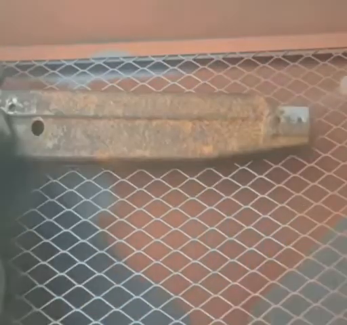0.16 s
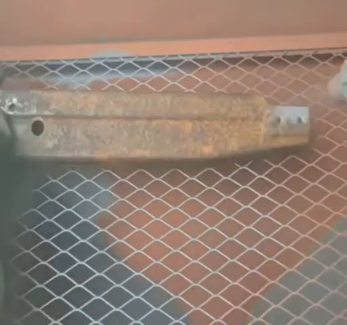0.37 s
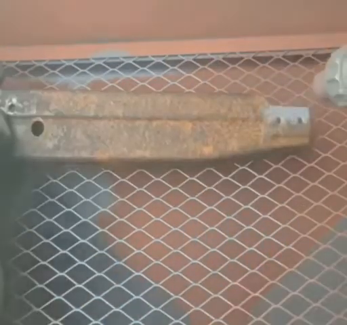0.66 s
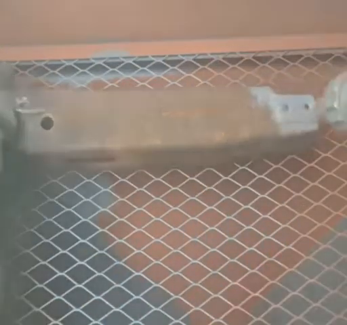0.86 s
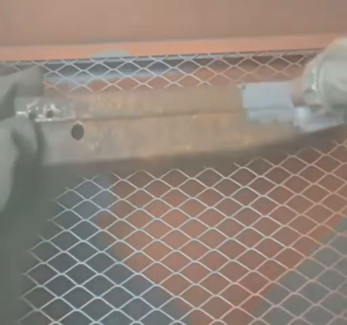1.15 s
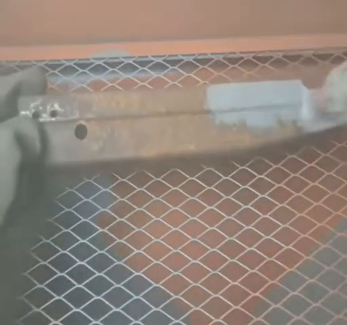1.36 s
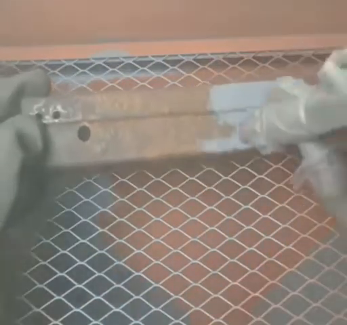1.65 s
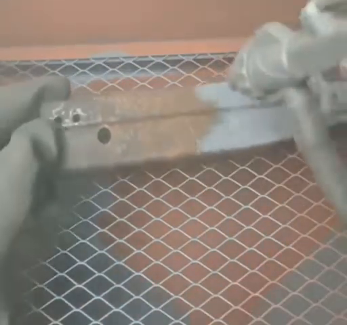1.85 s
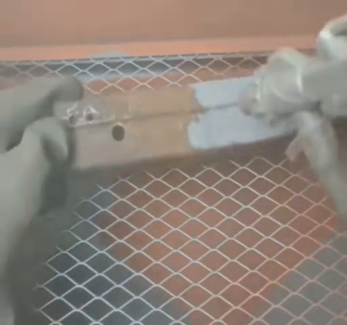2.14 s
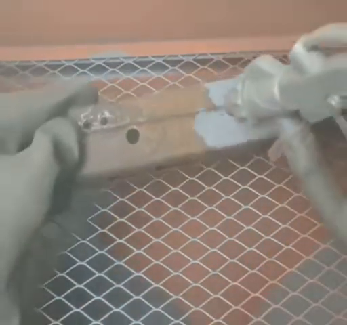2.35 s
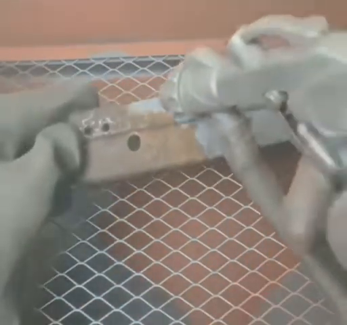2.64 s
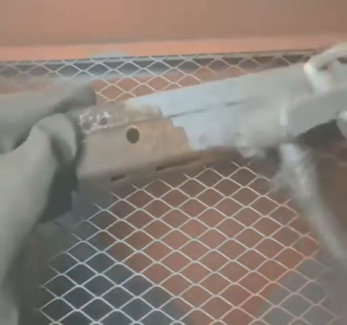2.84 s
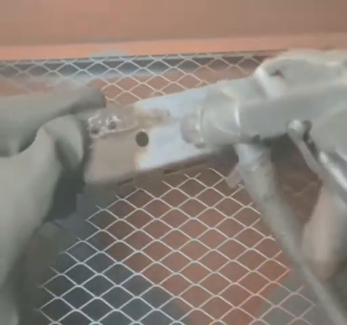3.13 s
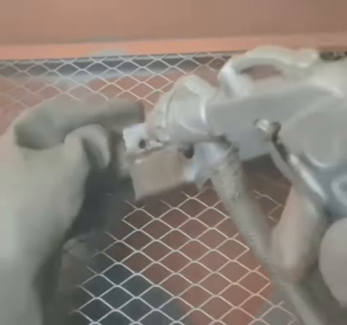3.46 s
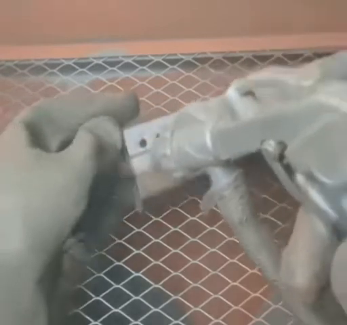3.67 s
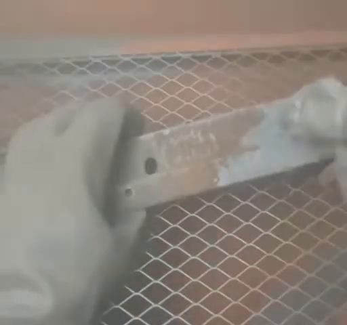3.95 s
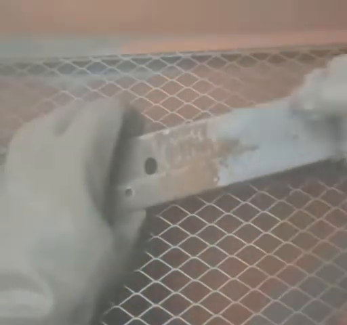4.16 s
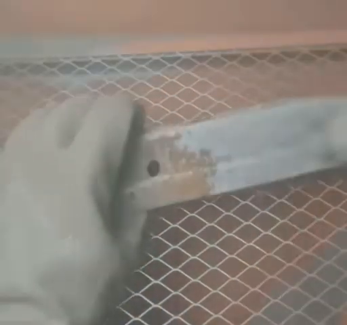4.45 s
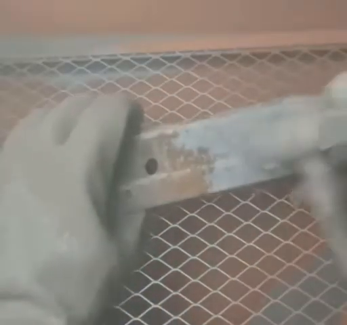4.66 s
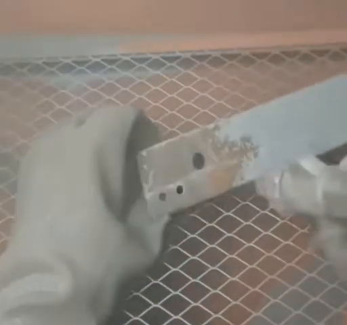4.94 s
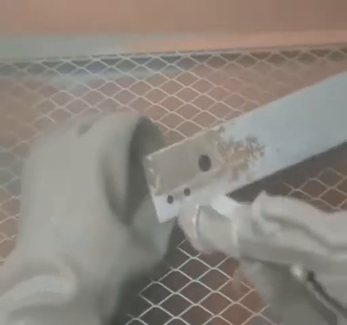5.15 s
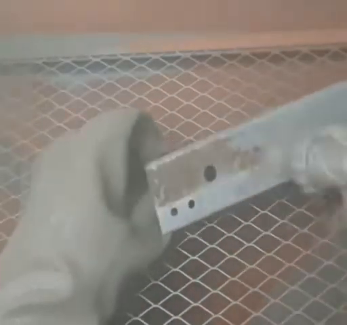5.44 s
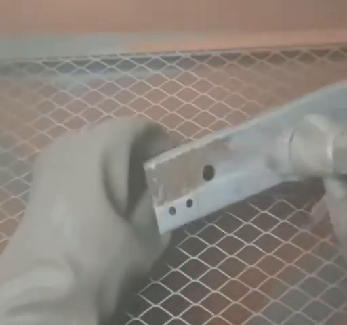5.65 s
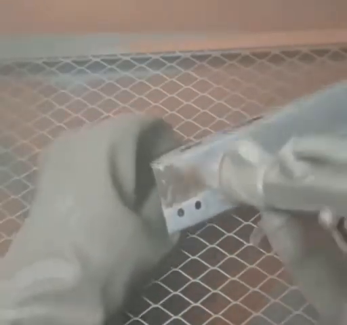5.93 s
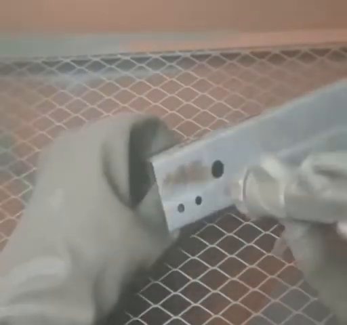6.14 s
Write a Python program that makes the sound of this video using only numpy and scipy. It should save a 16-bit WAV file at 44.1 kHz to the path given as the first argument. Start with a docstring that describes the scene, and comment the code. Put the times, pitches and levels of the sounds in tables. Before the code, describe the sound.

A continuous, dense rush of compressed air and abrasive grit on steel, heard close, the same on both sides, with short metallic cabinet reflections. After half a second it suddenly weakens, then builds back. Passes over the bar change the splash and sizzle, with a breathy note underneath. Halfway through, the jet locks into a clear thin whistle, and a soft triple knock follows before the blasting continues to the end.

```python
"""Blast cabinet, close up

A blast gun strips rust from a steel bar inside a cabinet; both channels are alike.
The air jet, filtered noise, drones and roars in the cabinet, with two hollow rings.
Air and grit, noise mixed with random impacts, splash and sizzle on the steel as the gun sweeps along.
The sound drops early on and swells back; once the bar is held anew, the jet locks into a thin whistle.
Narrow-band noise flares up in short swells; the bar shifts in the glove with three quick, dull knocks."""
import sys
import numpy as np
from scipy import signal
from scipy.fft import rfft, irfft
from scipy.io import wavfile
from scipy.ndimage import uniform_filter1d, map_coordinates

SR = 44100
rng = np.random.default_rng(int(sys.argv[2]) if len(sys.argv) > 2 else 0)


def output_pcm(signal):
    """Save a mono or channel-first signal as 16-bit PCM at the path in sys.argv[1].

    Samples are clipped to [-1, 1] before scaling.
    """
    pcm = np.clip(np.atleast_2d(signal).T, -1, 1) * 32767
    wavfile.write(sys.argv[1], SR, np.round(pcm).astype(np.int16))


N = 277830
T = np.arange(N) / SR
HZ = np.fft.rfftfreq(N, 1 / SR)
EDGE_HZ = 15830  # upper band limit

# bar and gun are held in three poses, one after another: (start of second, start of third [s])
POSE_STARTS_S = [0.51, 3.513]
# peaks and dips of the sound's colour:
# (centre [Hz], width [Hz], gain in the first, second, third pose [dB])
COLOUR_PEAKS = [(125, 80, -4.5, 0.5, 2), (593, 38, 6, 1.5, 0.5), (684, 37, 9.5, -0.5, 3),
                (750, 51, -6, -3.5, 2), (842, 55, 5, 2.5, 4), (980, 87, 6.5, 6.5, 4),
                (1210, 69, 12.5, 4.5, 6.5), (1450, 74, 10.5, 6, 2.5), (1660, 75, -1, 2, -3.5),
                (1880, 180, 2, -0.5, 1.5), (2110, 170, 4, 4.5, 0.5), (4900, 210, 5, 2.5, 5),
                (5430, 140, 7.5, 4.5, 4.5), (5900, 290, 5.5, 3.5, 4), (8000, 370, -5, -2, -3),
                (8410, 190, 6, 6, 7), (8800, 250, 8, -0.5, 3), (8820, 420, -3, 6, 2)]

# broad spectra, relative: (frequency [Hz], spectral level [dB])
DRONE_SHAPE = [(15, -23), (40, -16), (80, -13), (130, -7.5), (185, -2.5), (235, 2.5), (290, -2), (350, -6),
               (500, -41), (1000, -62)]
ROAR_SHAPE = [(150, -29.5), (320, -18), (440, -4.5), (650, -2), (950, 2), (1350, -0.5), (1650, -0.5),
              (2100, -5), (2400, -11.5), (3200, -14.5), (6000, -62)]
SPLASH_SHAPE = [(900, -38), (2000, -4), (2700, -0.5), (3600, 1.5), (4400, 0.5), (5700, -1), (6800, -3.5),
                (8200, -7), (11000, -10)]
SIZZLE_SHAPE = [(3000, -34), (6000, -9), (7300, -4.5), (8150, -3), (8450, -6.5), (9500, -1), (10050, -6),
                (10700, -4), (11500, -9.5), (12500, -10), (15000, -19)]
NOZZLE_SHAPE = [(9000, -33), (11200, -2.5), (12300, -2), (13400, 4.5), (14200, 0), (14900, 0.5),
                (15400, -6), (16000, -12)]
FIZZ_SHAPE = [(13500, -50), (14950, -18), (15230, 0), (15700, 1), (16000, -6)]
RUMBLE_SHAPE = [(12, -16), (40, -4), (100, -7), (180, 3), (290, -2), (400, -11), (900, -45)]

# base levels, before trims and fluctuation: (first, second, third pose [dB])
DRONE_BASE_DB = (-49, -46, -47.5)
SPLASH_BASE_DB = (-29.5, -31, -33.5)
SIZZLE_BASE_DB = (-31.5, -34, -34)
NOZZLE_BASE_DB = (-35, -34.5, -34)

# the jet's roar in the cabinet, before flutter: (time [s], level [dB])
ROAR = [(0, -27.5), (.39, -29), (.48, -30.5), (.6, -27), (1.1, -25.5), (1.55, -27.5), (2.3, -26.5),
        (2.5, -28), (3.0, -28), (3.3, -26.5), (4.15, -29), (5.3, -28), (5.48, -30), (6.3, -29.5)]
# the cabinet's two strongest hollow rings: (time [s], lower ring level [dB], upper ring level [dB])
RINGS = [(0, -46, -40), (.65, -54, -39), (1.05, -48, -37.5), (1.25, -50, -32), (1.45, -53, -37),
         (1.85, -40, -33.5), (2.3, -43, -39), (2.5, -48, -42), (3.0, -42, -43), (3.16, -46, -35.5),
         (3.28, -36, -46), (3.55, -32.5, -42), (4.0, -36.5, -36.5), (4.25, -38.5, -42), (5.1, -40, -49),
         (6.3, -43, -42)]
# fizz at the very top of the hiss, before flicker: (time [s], level [dB])
FIZZ = [(0, -39), (.45, -38), (.56, -32), (.75, -42), (1.12, -44), (1.22, -33), (1.38, -43), (1.56, -35),
        (1.66, -39), (1.82, -33), (2.02, -45), (2.2, -40), (2.54, -32), (2.65, -39), (2.74, -34),
        (3.1, -35), (3.3, -42), (3.48, -34), (3.6, -52)]
# passes of the jet onto the bar (+) or off it (-):
# (start [s], end [s], splash of air change [dB], sizzle of grit change [dB])
PASSES = [(0.165, 0.244, 2, 0.5), (0.344, 0.48, 2, 1.5), (0.74, 1.074, 1.8, -2), (1.095, 1.464, 0.5, -1),
          (1.475, 1.57, -0.5, -3), (1.595, 1.79, -0.5, -1.5), (1.805, 1.87, -1, -4.5),
          (2.253, 2.49, 0.2, 3.5), (2.52, 2.62, -2, -3), (2.633, 2.654, -0.5, 7), (2.683, 2.722, 2.5, 5),
          (2.73, 2.805, -1.5, 5), (2.82, 2.893, -1.5, 0.5), (2.901, 2.94, -3.5, 6.5),
          (2.946, 3.196, -3, 3.5), (3.197, 3.36, -2.5, 2.5), (3.357, 3.408, -2, 5), (3.415, 3.51, -2, 3),
          (3.525, 3.57, 4, 1.5), (3.58, 3.72, 3.5, 0.5), (3.797, 3.928, 5, 0), (3.99, 4.048, 2, 0.5),
          (4.08, 4.207, -1, -4), (4.227, 4.55, 0.5, -2.5), (4.65, 4.713, 2, 1), (4.773, 4.93, 1.5, 3.5),
          (4.994, 5.085, -1.5, 5), (5.105, 5.222, 1.5, 2), (5.239, 5.292, -0.5, -3.5),
          (5.391, 5.496, 0.5, 3.5), (5.5, 5.851, 0, 1.5), (5.853, 5.91, -2, 5.5), (6.001, 6.065, 0.5, 6),
          (6.16, 6.28, .5, 4.5)]
# short swells of narrow-band noise, one at the very top of the hiss:
# (centre [s], length [s], level [dB], frequency [Hz], half-width [Hz])
FLARES = [(1.07, 0.051, -28, 4860, 130), (1.092, .07, -30, 5600, 140), (1.74, 0.17, -39, 5230, 160),
          (1.797, .1, -31, 15700, 200), (2.698, 0.043, -38, 4730, 400), (2.77, 0.077, -39, 7600, 400),
          (2.96, 0.16, -41, 7300, 200), (3.11, 0.25, -37, 10800, 350), (3.39, 0.066, -32, 10240, 700),
          (3.66, 0.042, -32, 5630, 500), (4.016, 0.069, -36.5, 4220, 300), (5.05, .06, -37, 14300, 600)]

# breathy note before the jet locks, before trim: (time [s], pitch [Hz], level [dB])
BREATHY = [(0, 1700, -39), (.4, 1720, -29.5), (.65, 1738, -32), (.85, 1743, -31), (1.4, 1727, -29),
           (1.74, 1721, -34), (1.79, 1728, -27), (2.1, 1707, -29), (2.36, 1711, -24.5), (2.6, 1717, -29.5),
           (2.8, 1730, -27), (3.04, 1748, -27), (3.075, 1750, -35), (3.5, 1765, -36)]
# locked whistle, before waver and dips: (time [s], pitch [Hz], level [dB])
WHISTLE = [(3.52, 1803, -25.5), (3.84, 1800, -25.5), (4.0, 1812, -25.5), (4.07, 1790, -25.5),
           (4.47, 1790, -25), (4.53, 1798, -24), (4.8, 1802, -24.5), (5.1, 1798, -26), (5.33, 1804, -23),
           (5.7, 1806, -26.5), (6.3, 1802, -28.5)]
# brief dips of the whistle, shallow to deep: (centre [s], level change [dB])
WHISTLE_DIPS = [(3.547, -10), (3.728, -8), (3.872, -10), (3.89, -1.5), (3.908, -15.5), (4.008, -2.5),
                (4.06, -3.5), (4.287, -5), (4.465, -6), (4.49, -6), (4.641, -13.5), (4.715, -13),
                (4.781, -9.5), (4.912, -5), (4.935, -5.5), (5.045, -7), (5.235, -5.5), (5.268, -5.5),
                (5.478, -7), (5.723, -9.5), (5.757, -10), (5.896, -11), (5.929, -19), (6.14, -16),
                (6.262, -27)]
# thin, high ring beside the whistle: (frequency [Hz], relative level [dB])
THIN_RING = [(9119, -11), (9382, 0), (13404, -9), (14901, -12)]

# quick cluster of three dull knocks of the bar in the glove: (time [s], level [dB])
KNOCKS = [(4.704, -28), (4.726, -33), (4.741, -21.5)]
# modes of one knock: (frequency [Hz], relative level [dB], 60 dB decay time [s])
KNOCK_MODES = [(45.05, -16, .05), (95, -12, .05), (174, -2.5, 0.058), (272, -5.5, 0.072)]


def amp(db):
    """Decibels to gain."""
    return 10 ** (np.asarray(db) / 20)


def unit(x):
    """Scales to an rms of 1."""
    return x / np.sqrt(np.mean(x ** 2) + 1e-20)


def follow(rows, axis=1):
    """One column of a curve, at every sample."""
    rows = np.asarray(rows)
    return np.interp(T, rows[:, 0], rows[:, axis])


def shape(points):
    """A short spectrum as a gain at every frequency."""
    hz, db = np.transpose(points)
    return amp(np.interp(np.log(HZ + 1), np.log(hz), db))


def swell(centre_s, length_s):
    """A smooth bump of height 1; length is its width at half height."""
    return 2 ** -np.minimum((2 * (T - centre_s) / length_s) ** 2, 60)


def noise():
    """White turbulence."""
    return rng.standard_normal(N)


def filtered_noise(gain):
    """Turbulence of rms 1, coloured by a gain at every frequency."""
    return unit(irfft(rfft(noise()) * gain, N))


def wander(rate_hz):
    """Smooth random fluctuation of rms 1, up to about the given rate."""
    return filtered_noise((HZ > 2) / (1 + (HZ / rate_hz) ** 4))


def narrow(hz, half_width_hz):
    """Turbulence in one narrow band; half-width is where the amplitude halves."""
    return filtered_noise(1 / (1 + ((HZ - hz) / half_width_hz) ** 2))


def blown(hz, width_hz, steady):
    """A resonance close to singing: turbulence around a wavering tone; steady is the tone's power share."""
    pitch_hz = hz + .5 * width_hz * wander(rate_hz=width_hz)
    phase = 2 * np.pi * np.cumsum(pitch_hz) / SR
    spectra = rfft(rng.standard_normal((2, N)))
    a, b = irfft(spectra / (1 + (HZ / width_hz) ** 2), N)
    tone = np.sqrt(2 * steady) * np.sin(phase)
    breath = unit(a * np.sin(phase) + b * np.cos(phase))
    return tone + np.sqrt(1 - steady) * breath


def grit(per_s=6500, spread_db=2.5):
    """Impacts of single grains on the steel; a few are large, up to the size of the sieve."""
    size_db = spread_db * np.minimum(rng.exponential(1, N), 5)
    impacts = amp(size_db) * rng.choice([-1, 1], N)
    return unit(impacts * (rng.random(N) < per_s / SR))


def in_air(hits, share):
    """Mixes the impacts into a rush of air; share is their part of the power."""
    return np.sqrt(share) * hits + np.sqrt(1 - share) * noise()


def poses(change_s=0.0034):
    """The share of each pose at every sample; the shares sum to 1."""
    begun = [np.clip((T - s) / change_s + .5, 0, 1) for s in POSE_STARTS_S]
    return -np.diff([np.ones(N), *begun, np.zeros(N)], axis=0)


def held(levels_db):
    """The level that belongs to the present pose, at every sample."""
    return np.array(levels_db) @ poses()


def sweep(edge_s=0.024):
    """Splash and sizzle changes in dB over the passes: a ramp across the bar's edge, a hold, a ramp back."""
    def crossed(s):
        return np.clip((T - s) / edge_s + .5, 0, 1)
    return sum(np.outer([splash_db, sizzle_db], crossed(start_s) - crossed(end_s))
               for start_s, end_s, splash_db, sizzle_db in PASSES)


def cabinet(drive, points):
    """Colours a source by its broad shape and the peaks and dips of the present pose."""
    hz, width_hz, *gains_db = np.transpose(COLOUR_PEAKS)
    distance = 2 * (HZ - hz[:, None]) / width_hz[:, None]
    bells = np.exp2(-np.minimum(distance ** 2, 20))
    coloured = irfft(rfft(drive) * shape(points) * amp(np.array(gains_db) @ bells), N)
    return sum(unit(x) * np.sqrt(share) for x, share in zip(coloured, poses()))


def sway(x, depth, rate_hz=5):
    """The colour drifts in pitch as gun and hands move; depth is the rms shift as a share of pitch."""
    place = np.arange(N) + np.cumsum(depth * wander(rate_hz))
    return map_coordinates(x, [place], order=5, mode="mirror")


def aim(x, patchy_db=1.18):
    """The colour of the hiss drifts as the jet crosses edges, holes and rust."""
    z = signal.stft(x, nperseg=512)[2]
    drift = uniform_filter1d(rng.standard_normal(z.shape), size=9, axis=0)  # over frequency
    drift = uniform_filter1d(drift, size=26, axis=1)  # over time
    return signal.istft(z * amp(patchy_db * unit(drift)), nperseg=512)[1][:N]


def walls(x, echo_db=-11, t60_s=0.083, count=120):
    """The direct sound plus quick reflections between the sheet-metal walls."""
    delay_s = rng.uniform(.002, .06, count)
    taps = np.zeros(SR)
    taps[(delay_s * SR).astype(int)] = rng.choice([-1, 1], count) * amp(-60 * delay_s / t60_s)
    echoes = signal.fftconvolve(x, taps / np.linalg.norm(taps))[:N]
    return x + amp(echo_db) * echoes


def drop(start_s=0.473, fall_s=0.037, depth_db=11.5, hold_s=0.11, recover_db_per_s=10.5):
    """Gain of the whole sound: a sudden drop, a hold, then a swell back at a steady dB rate."""
    fallen = np.clip((T - start_s) / fall_s, 0, 1)
    regained_db = recover_db_per_s * np.maximum(T - start_s - fall_s - hold_s, 0)
    return amp(-fallen * np.maximum(depth_db - regained_db, 0))


def drone(buffet_db=1.7):
    """Low turbulence droning in the cabinet, its level buffeted."""
    return cabinet(noise(), DRONE_SHAPE) * amp(held(DRONE_BASE_DB) + buffet_db * wander(rate_hz=20))


def rings():
    """Two hollow cabinet resonances excited by the jet; the upper one is close to singing."""
    lower = narrow(hz=829, half_width_hz=34) * amp(follow(RINGS, axis=1))
    upper = blown(hz=971, width_hz=26, steady=0.54) * amp(follow(RINGS, axis=2))
    return lower + upper


def knocks(push_s=0.0023, rumble_db=-42, shift_s=4.738, shift_length_s=.06):
    """The bar shifts in the glove: three quick, dull, damped knocks over a short, loose rumble."""
    t = T[:SR // 4]
    modes = sum(amp(db - 60 * t / t60_s) * np.sin(2 * np.pi * hz * t) for hz, db, t60_s in KNOCK_MODES)
    thud = (1 - np.exp(-t / push_s)) * modes  # soft onset
    cluster = sum(amp(db) * np.interp(T - s, t, thud, left=0, right=0) for s, db in KNOCKS)
    rumble = filtered_noise(shape(RUMBLE_SHAPE)) * amp(rumble_db) * swell(shift_s, shift_length_s)
    return rumble + cluster


def flares():
    """Short swells of narrow-band noise."""
    return sum(narrow(hz, half_width_hz) * amp(db) * swell(s, length_s)
               for s, length_s, db, hz, half_width_hz in FLARES)


def breathy_note(unsteady, trim_db=-4.5, gust_db=0.5):
    """A resonance blown by the jet, half tone and half breath."""
    note = blown(hz=follow(BREATHY, axis=1), width_hz=40, steady=0.46)
    return note * amp(follow(BREATHY, axis=2) + trim_db + gust_db * unsteady)


def locked_whistle(unsteady, skirt_db=-16, waver_hz=3, shake_db=0.2, flutter_db=0.4,
                   dip_s=0.01113, sag_hz_per_db=1.83):
    """A locked jet sings a near-steady tone in a skirt of turbulence; a dipping tone goes flat."""
    dip_db = sum(db * swell(s, dip_s) for s, db in WHISTLE_DIPS) + flutter_db * unsteady
    pitch_hz = follow(WHISTLE, axis=1) + waver_hz * wander(rate_hz=19) + sag_hz_per_db * dip_db
    tone = np.sqrt(2) * np.sin(2 * np.pi * np.cumsum(pitch_hz) / SR)
    tone *= amp(shake_db * wander(rate_hz=110) + dip_db)
    skirt = amp(skirt_db) * narrow(hz=1774, half_width_hz=18)
    return (tone + skirt) * amp(follow(WHISTLE, axis=2))


def thin_ring(base_db=-45.0):
    """Thin, high ringing bands of noise that grow with the sizzle."""
    ring = sum(amp(db) * narrow(hz, half_width_hz=7.8) for hz, db in THIN_RING)
    return ring * amp(sweep()[1] + base_db)


def whistle():
    """The jet's note: breathy through two poses, locked with its thin ring in the third."""
    unsteady = wander(rate_hz=40)
    last_pose = poses()[-1]
    locked = locked_whistle(unsteady) + thin_ring()
    return breathy_note(unsteady) * (1 - last_pose) + locked * last_pose


def roar(feed, hits, sputter_db=0.5, flutter_db=0.5):
    """Jet turbulence and some grit roar in the cabinet, fluttering a little with the uneven feed."""
    rush = cabinet(in_air(hits, share=0.11), ROAR_SHAPE)
    rush *= amp(follow(ROAR) + sputter_db * feed + flutter_db * wander(rate_hz=25))
    return sway(rush, depth=0.0063)


def splash(feed, hits, sputter_db=0.74):
    """Air splashes off the steel with each pass."""
    level_db = held(SPLASH_BASE_DB) + sweep()[0] + sputter_db * feed
    return cabinet(in_air(hits, share=0.24), SPLASH_SHAPE) * amp(level_db)


def sizzle(feed, hits, trim_db=-0.9, sputter_db=0.46):
    """Grit sizzles on the steel with each pass."""
    level_db = held(SIZZLE_BASE_DB) + sweep()[1] + trim_db + sputter_db * feed
    return cabinet(in_air(hits, share=0.12), SIZZLE_SHAPE) * amp(level_db)


def nozzle(feed, hits, trim_db=1.1, sputter_db=0.9, follow_db_per_db=0.27):
    """High nozzle hiss of air and grit, partly following the sizzle."""
    level_db = held(NOZZLE_BASE_DB) + follow_db_per_db * sweep()[1] + trim_db + sputter_db * feed
    return cabinet(in_air(hits, share=0.24), NOZZLE_SHAPE) * amp(level_db)


def fizz(flicker_db=1.3):
    """Flickering turbulence at the very top of the hiss."""
    top = filtered_noise(shape(FIZZ_SHAPE) * (HZ < EDGE_HZ))
    return top * amp(follow(FIZZ) + flicker_db * wander(rate_hz=25))


def blast(feed, hits):
    """Air and grit on the steel; clumps of grit make the hiss sputter."""
    hiss = splash(feed, hits) + sizzle(feed, hits) + nozzle(feed, hits)
    return aim(sway(hiss, depth=0.00824) + fizz())


def scene():
    """Sums all sources under the common drop; both channels are alike."""
    feed = unit(wander(rate_hz=16.5) + 0.14 * wander(rate_hz=120))  # grit arrives in clumps
    hits = grit()
    background = drone() + rings() + knocks()
    jet = whistle() + roar(feed, hits)
    mono = drop() * (background + jet + walls(flares() + blast(feed, hits)))
    return np.array([mono, mono])


def record(dry):
    """Steep low-pass at the band limit."""
    taps = signal.firwin(1023, EDGE_HZ, window=("kaiser", 9), fs=SR)
    return signal.oaconvolve(dry, taps[None], "same", axes=1)


dry = scene()
out = record(dry)
output_pcm(out)
```